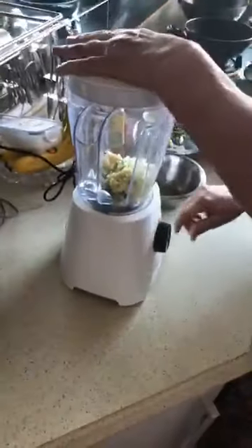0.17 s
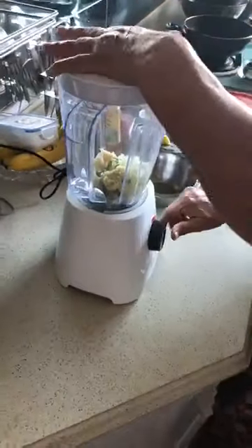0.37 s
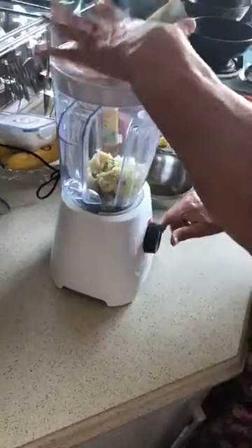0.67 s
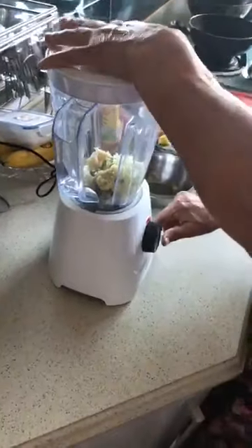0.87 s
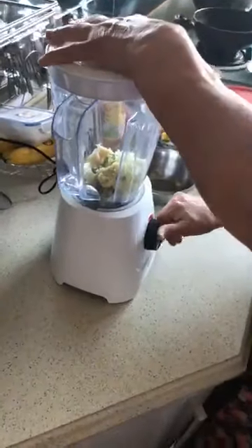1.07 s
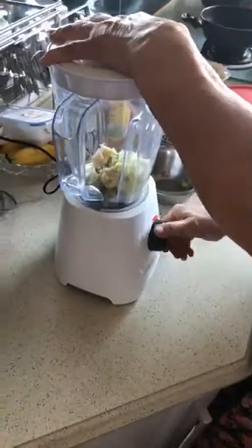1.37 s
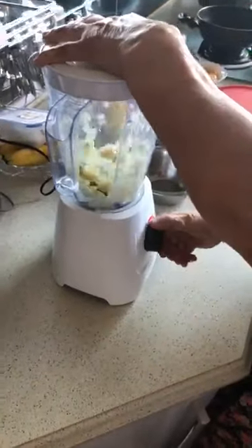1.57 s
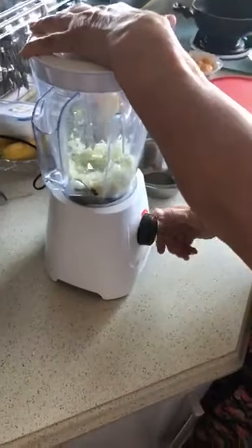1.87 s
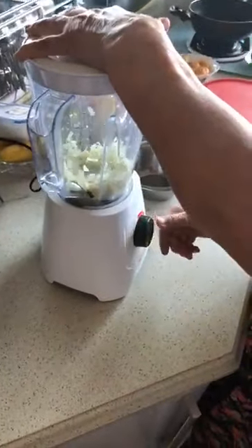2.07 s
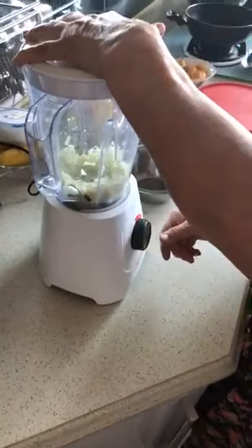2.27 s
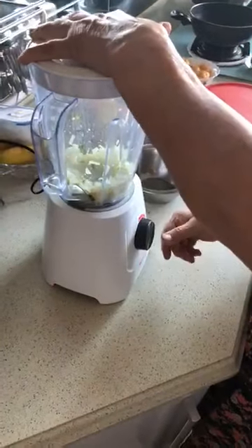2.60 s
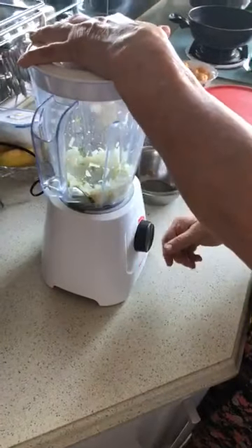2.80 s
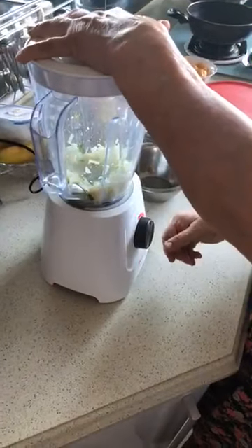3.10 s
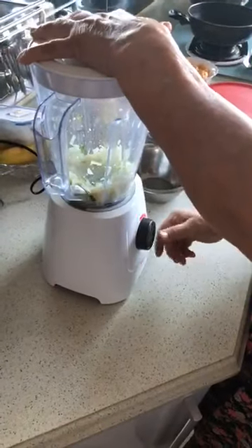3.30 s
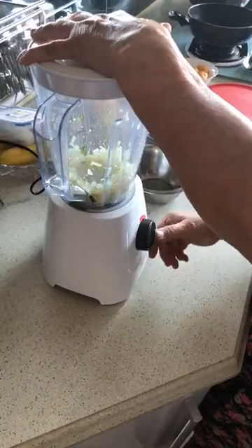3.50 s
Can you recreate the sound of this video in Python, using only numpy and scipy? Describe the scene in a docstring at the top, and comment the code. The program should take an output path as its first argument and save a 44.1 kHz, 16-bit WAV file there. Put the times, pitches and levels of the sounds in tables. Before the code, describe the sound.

Close by in a small kitchen, a blender grinds vegetables. Soft lid taps come first, then the dial clicks and the motor roars up, its chunky rattling smoothing into a high, even whine.

```python
"""Countertop blender in a small kitchen

A hand taps and shifts the plastic lid and presses it down; the dial clicks. The motor runs up on
half-wave mains, throbbing about 50 times a second, while its blades fling vegetable pieces against
the jar in thumps. As the pieces get finer the shaft speeds up, and a whine of shaft orders stands
out of the grinding and the rush of air."""
import sys
import numpy as np
from scipy import signal
from scipy.fft import rfft, irfft, next_fast_len
from scipy.io import wavfile
from scipy.ndimage import map_coordinates

SR = 44100
rng = np.random.default_rng(int(sys.argv[2]) if len(sys.argv) > 2 else 0)


def file_out(sig):
    """Save sig as 16-bit WAV at sys.argv[1]."""
    # one column per channel
    cols = np.atleast_2d(sig).T
    # limit, then scale
    lim = np.clip(cols, -1, 1)
    pcm = np.round(lim * 32767).astype(np.int16)
    wavfile.write(sys.argv[1], SR, pcm)


N = 160965
TIME = np.arange(N) / SR
MOTOR_ON_S, FIRST_THROB_S, MAINS_HZ = 1.479, 1.4822, 49.9


def amp(db):
    """Decibels to gain."""
    return 10 ** (np.asarray(db) / 20)


def unit(x):
    """Scale to rms 1."""
    return x / np.sqrt(np.mean(x ** 2) + 1e-20)


def along(points, hz):
    """Read (frequency, value) breakpoints on a log frequency axis."""
    freqs, values = np.transpose(points)
    return np.interp(np.log(hz + 1), np.log(freqs + 1), values)


def curves(rows):
    """One automation curve for each column after the time."""
    times, *columns = np.transpose(rows)
    return [np.interp(TIME, times, column) for column in columns]


def wobble(rate):
    """Smooth random modulation, rate knots a second."""
    return map_coordinates(rng.standard_normal(4096), [TIME * rate], mode="wrap")


def filtered(x, response):
    """EQ x with a gain given as a function of frequency."""
    size = next_fast_len(N + SR // 2)
    return irfft(rfft(x, size) * response(np.fft.rfftfreq(size, 1 / SR)), size)[:N]


def noise(spectrum):
    """Coloured noise of rms 1."""
    return unit(filtered(rng.standard_normal(N), lambda hz: amp(along(spectrum, hz))))


def throb(sharp):
    """One torque pulse per mains cycle, rms 1."""
    return unit(np.exp(sharp * (np.cos(2 * np.pi * MAINS_HZ * (TIME - FIRST_THROB_S)) - 1)))


# Dark room tone (frequency [Hz], relative level [dB])
ROOM_TONE = [(20, -13), (40, 1), (64, 4), (90, -7.5), (200, -5.5), (310, -14), (480, -9), (640, -13),
             (800, -18.5), (1300, -19.5), (2150, -23), (2700, -31), (6500, -39.5), (15500, -57.5)]
# Partials of an appliance in the room (frequency [Hz], level [dB])
APPLIANCE_HUM = [(150.7, -52.5), (414.5, -61), (446.8, -55)]
def background():
    """The bed: room tone and a faint, wavering appliance hum."""
    hum = np.zeros(N)
    for hz, db in APPLIANCE_HUM:
        swell = amp(db + 4.1 * wobble(rate=6.1))
        hum += swell * unit(np.sin(2 * np.pi * hz * TIME + 0.61 * wobble(rate=12)))
    return amp(-41) * noise(ROOM_TONE) + hum


# Hits on lid and housing (time [s], level [dB], t60 [s], centre [Hz], half-width [octaves])
KNOCKS = [(0.05, -32, 0.029, 1680, 1.33), (0.048, -36.5, 0.26, 1550, 0.4), (0.853, -42, 0.12, 1000, 1.3),
          (1.473, -21.5, 0.055, 2800, 1.7), (1.481, -14.5, 0.045, 570, 0.32),
          (1.502, -22.5, 0.056, 2600, 0.87), (3.38, -23, .05, 7840, 0.49)]
def knocks():
    """Taps on plastic and the dial's click: bursts of band noise with a hard attack."""
    out = np.zeros(N)
    for start, db, t60, centre, octaves in KNOCKS:
        band = lambda hz: 1 / (1 + (np.log2((hz + 1) / centre) / octaves) ** 4) ** 1.5
        crack = unit(filtered(rng.standard_normal(N), band))
        out += crack * (TIME >= start) * amp(db - 60 * np.abs(TIME - start) / t60)
    return out


# Blows to the whole jar (time [s], level [dB])
THUDS = [(0.048, -37.5), (0.8548, -28.5), (1.481, -27.5)]
# The jar's low modes (frequency [Hz], relative level [dB], t60 [s])
JAR_MODES = [(422.3, -4.5, 0.31), (487, -1, 0.1), (540, -1, 0.078), (726, -2.5, 0.036)]
def thuds():
    """Each blow sets the jar's low modes ringing."""
    out = np.zeros(N)
    for start, db in THUDS:
        age = np.maximum(TIME - start, 0)
        for hz, mode_db, t60 in JAR_MODES:
            out += amp(db + mode_db - 60 * age / t60) * np.sin(2 * np.pi * hz * age)
    return out


# Strokes of the palm (peak time [s], level [dB], rise [s], fall [s])
SLIDES = [(0.54, -51.5, 0.041, 0.058), (0.615, -56, 0.037, 0.078), (0.865, -53.5, 0.016, 0.033)]
# Hiss of skin on plastic (frequency [Hz], relative level [dB])
SKIN_HISS = [(800, -20), (2500, -3), (4200, 4.5), (7000, -3), (11000, -7), (15500, -15)]
def palm_slides():
    """The palm rubs over the lid in short, grainy swells."""
    out = np.zeros(N)
    for peak, db, rise, fall in SLIDES:
        swell = np.exp(-np.maximum((peak - TIME) / rise, (TIME - peak) / fall))
        out += noise(SKIN_HISS) * amp(db + 1.3 * wobble(rate=200)) * swell
    return out


def field_hum():
    """The motor's iron hums on mains harmonics 2 to 4."""
    angle = 2 * np.pi * MAINS_HZ * TIME
    return sum(amp(db) * np.sin(k * angle + 2 * np.pi * rng.random())
               for k, db in [(2, -45), (3, -47), (4, -49)])


# Hollow body of the jar (frequency [Hz], relative level [dB])
BOOM_COLOUR = [(60, -42), (150, -20.5), (310, -17.5), (400, -9), (460, 0), (560, -2.5), (670, -23),
               (770, -3.5), (900, -11), (1400, -47)]
def jar_boom(db, load):
    """The jar booms with each torque pulse; the throb smooths out as the load eases."""
    depth = load ** 0.35
    pulsing = np.sqrt(1 - depth + depth * throb(sharp=1.54) ** 2)
    return noise(BOOM_COLOUR) * pulsing * amp(db - 8.5 + 4.3 * load)


# Wet midrange of the grind (frequency [Hz], relative level [dB])
GRIND_COLOUR = [(300, -47), (700, -15), (900, -8), (1000, -4.5), (1140, 1), (1350, -10), (1580, 0.5),
                (1800, -6), (2350, -7), (2700, -14.5), (3600, -18.5), (9000, -37)]
def pulp(db, load):
    """The blades tear the pulp: a rough noise, louder under load."""
    return noise(GRIND_COLOUR) * amp(db - 3.5 + 2 * load + 1.34 * wobble(rate=120))


# Bright rush of air (frequency [Hz], relative level [dB])
AIR_COLOUR = [(100, -14), (320, -1.5), (640, -6), (1200, -15), (2600, -1), (3400, -2), (4200, 0.5),
              (5100, 3.5), (6200, -1), (7000, -3), (9000, -5.5), (10000, -11), (12000, -12.5), (13000, -20),
              (15700, -21)]
def fan(db, speed):
    """The fan's air swishes lightly with each turn and each torque pulse."""
    swish = 1 + 0.055 * np.cos(2 * np.pi * np.cumsum(speed) / SR) + 0.053 * throb(sharp=1.8)
    return noise(AIR_COLOUR) * swish * amp(db - 1.08 + 0.77 * wobble(rate=300))


# Resonances of the plastic wall (frequency [Hz], width [Hz], relative level [dB])
WALL_RINGS = [(520, 84, -1), (730, 60, 7), (1210, 610, -4.5), (1470, 47, 5), (2430, 260, -14.5),
              (4800, 4500, -37), (8500, 3000, -38)]
def small_pieces(db, load, speed):
    """Pieces patter on the wall at random, two a turn on average, and ring the plastic."""
    def plastic(hz):
        return sum((-1) ** k * amp(ring_db) * 1j * hz * width / (centre**2 - hz**2 + 1j * hz * width)
                   for k, (centre, width, ring_db) in enumerate(WALL_RINGS))
    hits = (rng.random(N) < 2 * speed / SR) * rng.uniform(-1.03, 1, N)
    return unit(filtered(hits, plastic)) * amp(db - 12.5 + 3.5 * load)


# Faders, ahead of each layer's own trim (time [s], boom [dB], grind [dB], air [dB])
CHURN_FADERS = [(1.5, -28.5, -29, -37.5), (1.6, -23.5, -28.5, -37.5), (1.69, -23, -23, -33.5),
                (2.0, -22.5, -24, -29.5), (2.45, -22, -22.5, -27), (2.75, -37, -26.5, -26),
                (3.05, -21.5, -24, -26.5), (3.35, -25, -24, -25.5), (3.65, -26, -26, -26.5)]
def churn(speed):
    """The blender's roar; the load eases as the pieces get finer."""
    boom_db, grind_db, air_db = curves(CHURN_FADERS)
    load = np.exp(-np.maximum(TIME - MOTOR_ON_S, 0) / 0.55)
    roar = jar_boom(boom_db, load) + pulp(grind_db, load) + fan(air_db, speed)
    return roar + small_pieces(grind_db, load, speed)


# Thumps of food, mostly on a torque pulse (time [s], level [dB])
THUMPS = [(1.542, -15), (1.561, -17), (1.621, -19), (1.662, -20), (1.742, -19), (1.801, -18), (1.821, -19),
          (1.904, -23), (1.942, -17), (2.042, -21), (2.082, -19), (2.122, -16.5), (2.163, -18),
          (2.403, -21), (2.435, -19.5), (2.522, -18), (2.564, -16.5), (2.584, -17)]
def big_pieces(attack_s=0.0012, t60=0.049, detune=0.054, crunch_db=-12, low_cut_hz=390):
    """A blade flings a big piece at the wall: a wet crunch and a thump that the food damps quickly."""
    out, age = np.zeros(N + SR), np.arange(SR // 10) / SR
    crunch = noise(GRIND_COLOUR)
    envelope = amp(-60 * age / t60) * (1 - np.exp(-age / attack_s))
    for start, db in THUMPS:
        *scatter_db, pitch_scatter = rng.standard_normal(len(JAR_MODES) + 1)
        pitch = 1 + detune * pitch_scatter
        ring = sum(amp(mode_db + offset) * np.sin(2 * np.pi * hz * pitch * age)
                   for (hz, mode_db, _), offset in zip(JAR_MODES, scatter_db))
        span = round(start * SR) + np.arange(len(age))
        out[span] += amp(db) * envelope * (ring + amp(crunch_db) * crunch[span])
    # The jar carries little of a blow's low end.
    return filtered(out[:N], lambda hz: 1 / (1 + (low_cut_hz / (hz + 1)) ** 10))


# Lead partials of the whine (order [cycles per turn])
LEAD_ORDERS = [2, 3, 6, 7, 12]
# Their faders (time [s], level of each order in turn [dB])
LEAD_FADERS = [(1.7, -44, -33, -38, -48, -48), (1.9, -36, -50, -36, -55, -39),
               (2.05, -34, -42, -47, -48, -32), (2.25, -31.5, -40, -44, -48, -37),
               (2.46, -29, -37, -33.5, -42, -34.5), (2.66, -25.5, -24.5, -23, -33.5, -30),
               (2.8, -27, -23, -31, -31.5, -42), (3.0, -31, -29, -23.5, -43, -49),
               (3.55, -29.5, -27, -23.5, -41, -50)]
# Faint partials and sidebands (order [cycles per turn], offset [mains multiples])
FAINT_LINES = [(1, 0), (1, 2), (2, -2), (2, -1), (3, 6), (4, 2), (5, 0), (8, 0), (9, 0), (24, 0)]
# Their balance, in turn (level at top speed [dB])
FAINT_DB = [-35.5, -38, -41.5, -37, -38, -33.5, -37, -37, -43, -38]
def whine(speed, roughness=0.3, flutter_hz=60, full_whine_hz=164):
    """Shaft orders, fluttering with the load and pulsed by the mains, fade in as the motor runs up."""
    def partial(cycles, rough, pulsed):
        angle = 2 * np.pi * (cycles + rng.random())
        tone = np.sin(angle) * (1 + rough * wobble(flutter_hz))
        phase_shake = pulsed * (pulse - pulse.mean()) + rough * wobble(flutter_hz)
        return unit(tone + phase_shake * np.cos(angle))
    turns = np.cumsum(speed * (1 + 0.00093 * wobble(rate=30))) / SR
    pulse = throb(sharp=9.9)
    lead, faint = np.zeros((2, N))
    for order, db in zip(LEAD_ORDERS, curves(LEAD_FADERS)):
        flicker_db = 0.16 * order * wobble(rate=22)
        lead += amp(db + flicker_db) * partial(order * turns, roughness / order, pulsed=1 / order)
    for (order, offset), db in zip(FAINT_LINES, FAINT_DB):
        faint += amp(db) * partial(order * turns + offset * MAINS_HZ * TIME, roughness, pulsed=0.22)
    return lead * np.minimum(speed / full_whine_hz, 1) ** 5 + faint * (speed / speed.max()) ** 14.7


# Faders of the commutator's two bands (time [s], 24th order [dB], 48th order [dB])
BRUSH_FADERS = [(1.63, -49, -57), (1.695, -38, -36), (1.74, -44, -52), (1.86, -45, -43), (1.95, -38, -52),
                (2.27, -49, -42), (2.7, -48, -52), (2.9, -43, -60)]
def brushes(speed):
    """The commutator's rough singing climbs and widens with the speed and comes in spurts."""
    def band(order, full_width_hz):
        angle = 2 * np.pi * order * np.cumsum(speed) / SR
        knots = np.cumsum(full_width_hz * (speed / speed.max()) ** 2) / SR
        cos_gain, sin_gain = (map_coordinates(row, [knots]) for row in rng.standard_normal((2, N // 2)))
        return unit(cos_gain * np.cos(angle) + sin_gain * np.sin(angle))
    low_db, high_db = curves(BRUSH_FADERS)
    low = amp(low_db) * band(order=24, full_width_hz=450)
    high = amp(high_db) * band(order=48, full_width_hz=1500)
    return amp(2.6 * wobble(rate=21)) * (low + high)


# Reverb decay (frequency [Hz], t60 [s])
KITCHEN_DECAY = [(1500, 0.48), (10000, 0.083)]
def kitchen(x):
    """The small room's reverb; the treble dies first."""
    hz, age, spectrum = signal.stft(rng.standard_normal(SR // 2), SR, nperseg=256)
    decay = amp(-60 * age / along(KITCHEN_DECAY, hz)[:, None])
    _, tail = signal.istft(spectrum * decay, SR, nperseg=256)
    return signal.fftconvolve(x, tail / np.linalg.norm(tail))[:N]


# The motor's run-up (time [s], shaft speed [turns/s])
SHAFT_SPEED = [(1.475, 40), (1.55, 105), (1.65, 151), (1.69, 163), (1.87, 202), (1.96, 210), (2.04, 219.6),
               (2.2, 232), (2.36, 240), (2.52, 244.8), (2.68, 247.8), (2.8, 251.4), (3.06, 254), (3.3, 256),
               (3.65, 257.3)]
def scene():
    """A mono mix on two channels: hits and noises feed the reverb, whine and hum stay dry."""
    speed, = curves(SHAFT_SPEED)
    motor_on = np.clip((TIME - MOTOR_ON_S) / 0.0019, 0, 1)
    handling = knocks() + thuds() + palm_slides()
    noises = handling + amp(0.5) * motor_on * (brushes(speed) + churn(speed)) + big_pieces()
    reverb = amp(-9) * kitchen(noises)
    tones = motor_on * (whine(speed) + field_hum())
    mono = noises + reverb + tones + background()
    return np.array([mono, mono])


def record(dry):
    """A brick-wall high cut takes off the very top."""
    return np.array([filtered(channel, lambda hz: hz < 15750) for channel in dry])


dry = scene()
out = record(dry)
file_out(out)
```